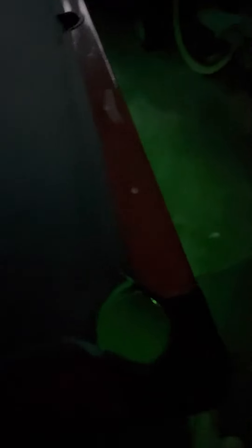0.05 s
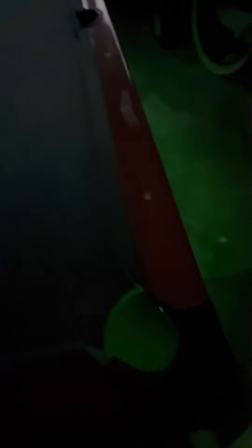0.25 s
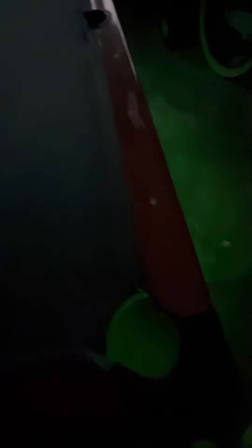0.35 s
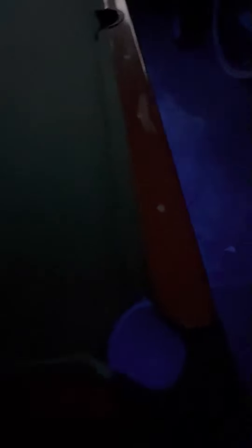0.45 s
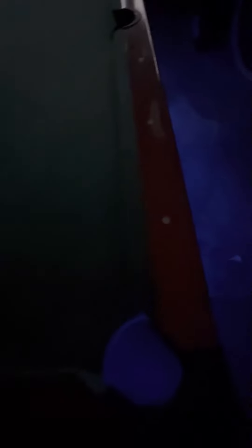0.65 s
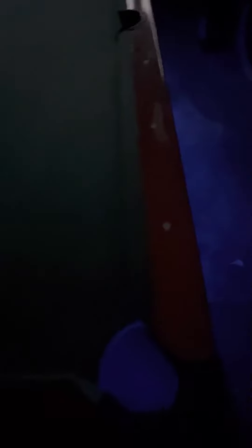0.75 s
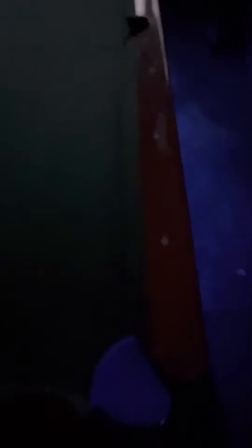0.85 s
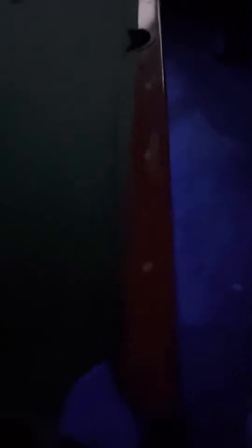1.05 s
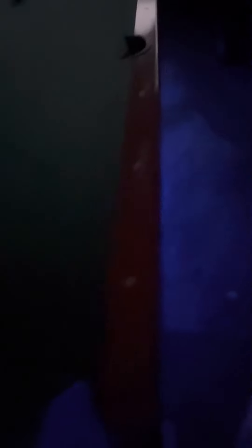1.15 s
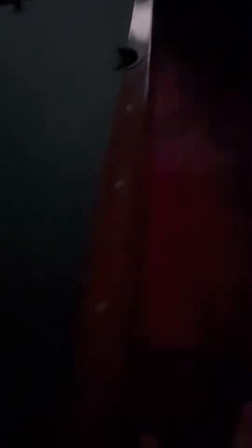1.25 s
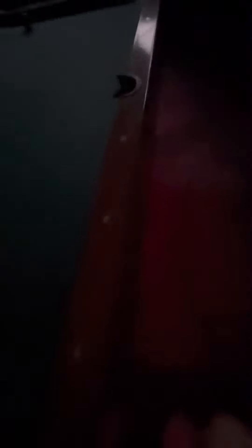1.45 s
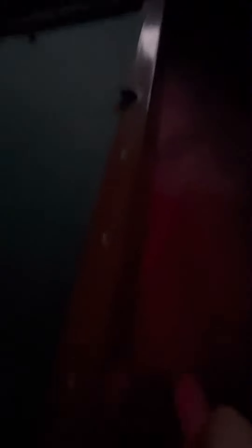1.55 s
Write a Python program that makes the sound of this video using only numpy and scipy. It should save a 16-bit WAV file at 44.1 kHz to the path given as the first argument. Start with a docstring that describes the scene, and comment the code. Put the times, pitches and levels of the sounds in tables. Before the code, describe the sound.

A ball rolls briefly on a wooden pool table and ends in a hard double knock. Weaker clacks and knocks follow with short rumbles, then a thin distant click. Heard close by in a quiet room with faint ventilation.

```python
"""Knocks on a wooden pool table in a quiet room. Something rolls with a low rumble and ends in a hard
double knock; weaker knocks and clacks follow, then a thin click further off. Each blow crosses the wood
as a bending wave, high notes first, leaves faint low tones lingering and dies away in the room.
Ventilation noise and mains hum go on underneath."""
import sys
import numpy as np
from scipy import signal
from scipy.fft import rfft, irfft
from scipy.io import wavfile

SR = 44100
rng = np.random.default_rng(int(sys.argv[2]) if len(sys.argv) > 2 else 0)


def wrap_up_sound(samples):
    """Save the sound to the file named by the first command line argument, as 16-bit audio."""
    columns = np.atleast_2d(samples).T
    # keep every value between -1 and 1, then stretch to whole-number steps
    tamed = np.clip(columns, -1, 1)
    steps = np.round(tamed * 32767).astype(np.int16)
    wavfile.write(sys.argv[1], SR, steps)


N = 70560
T = np.arange(N) / SR
SIZE = 2 * N  # extra space for the echoes
HZ = np.maximum(np.arange(N + 1) * SR / SIZE, 1)  # the frequencies of every spectrum
FADE_60_DB = np.log(1000)  # a "fade time" is the time a sound takes to drop by 60 dB

# light, hard hits: (time [s], pitch ratio, tone 1 [dB], tone 2 [dB], tone 3 [dB], thump [dB])
CLACK_HITS = [(0.5930, 0.95, 11.5, 20, 7, 17.9), (0.839, 0.947, -13, 2, 1.5, 4),
              (1.0093, 0.896, 5.5, -1, 5, 13.2), (1.1290, 0.91, -4.5, -7, -5, 5.3)]


def from_db(db):
    """Turns decibels into a factor to multiply by."""
    return 10 ** (np.asarray(db) / 20)


def at_hz(points, hz=HZ):
    """Reads between the rows of a (frequency, value) table, with octaves evenly spaced."""
    freqs, values = np.transpose(points)
    return np.interp(np.log(hz), np.log(freqs), values)


def delay(s):
    """Spectrum of a click at s seconds; multiplying by it delays a sound."""
    return np.exp(-2j * np.pi * HZ * s)


def diffuse():
    """Spectrum of white noise from all around: alike in both ears in the bass, wide in the treble."""
    # stereo width: (frequency [Hz], side minus mid [dB])
    widths = [(60, -17.5), (200, -25), (370, -14.5), (670, -4.5), (1200, -3), (2300, -3), (4000, 3),
              (7500, 2.5), (13000, -5.5)]
    mid, side = rfft(rng.standard_normal((2, SIZE)))
    width = from_db(at_hz(widths))
    return (mid + side * width * [[1], [-1]]) / np.sqrt(1 + width ** 2)


def noise(colour):
    """Stereo noise with the given tone colour, scaled to an average (rms) size of 1."""
    shaped = irfft(diffuse() * from_db(at_hz(colour)))[:, :N]
    return shaped / shaped.std()


def background():
    """Ventilation noise, mains hum and a faint fan tone."""
    # tone colour of the ventilation: (frequency [Hz], relative level [dB])
    air_colour = [(25, -40), (72, -12.5), (130, -6.5), (264, -11), (335, -7.5), (600, -9.5), (790, -7),
                  (900, -7), (1250, -17.5), (2900, -23.5), (4600, -26), (6300, -34.5), (9000, -38.5),
                  (13000, -41.5)]
    # mains hum and fan tone: (frequency [Hz], level [dB])
    tones = [(59.7, -55.5), (797, -61.5)]
    air = from_db(-50) * noise(air_colour)
    hum = sum(from_db(db) * np.sqrt(2) * np.sin(2 * np.pi * (hz * T + rng.random())) for hz, db in tones)
    return air + hum


def rolling():
    """Rolling rumbles: a long run that starts with a scuff, then short ones after the weaker blows."""
    # runs of rolling: (start [s], start of fade [s], level [dB])
    runs = [(0.029, 0.328, -33), (0.602, 0.655, -40.5), (0.795, 0.856, -37.5), (1.012, 1.052, -44.5)]
    # tone colour of the rumble: (frequency [Hz], relative level [dB])
    rumble_colour = [(30, -19), (60, -2.5), (120, 6), (220, 2), (360, -4), (600, -14.5), (1000, -23),
                     (2500, -30.5), (4000, -37), (7000, -80), (13000, -45)]
    # tone colour of the scuff: (frequency [Hz], relative level [dB])
    scuff_colour = [(300, -13.5), (850, 5.5), (1500, 0), (2600, -10), (4500, -24), (9000, -66)]
    rise_s, decay_s = 0.0025, 0.059
    scuff_at_s, scuff_decay_s, scuff_db = 0.044, 0.017, -38.5
    level = 0
    for start, end, db in runs:
        rise = np.clip((T - start) / rise_s, 0, 1)
        fade = np.exp(-np.maximum(T - end, 0) / decay_s)
        level = level + from_db(db) * rise * fade
    scuff = from_db(scuff_db) * (T > scuff_at_s) * np.exp(-np.abs(T - scuff_at_s) / scuff_decay_s)
    return level * noise(rumble_colour) + scuff * noise(scuff_colour)


def thumps():
    """Spectrum of low pushes on the table: bumps while rolling, and one just after each clack."""
    # bumps while rolling: (time [s], strength [dB])
    bumps = [(0.031, 10.5), (0.043, 11), (0.058, 11), (0.094, 8.5), (0.15, 11.5), (0.191, 7), (0.812, 10.5)]
    # tone colour of a thump: (frequency [Hz], gain [dB])
    colour = [(30, -51), (60, -9.5), (110, -8.5), (220, -2.5), (330, 2), (500, -15), (1000, -26),
              (3000, -50.5), (12000, -68)]
    lag_s = 0.00595
    after_clacks = [(s + lag_s, db) for s, *_, db in CLACK_HITS]
    return sum(from_db(db + at_hz(colour)) * delay(s) for s, db in [*bumps, *after_clacks])


def knocks():
    """Spectrum of heavy blows on the wood; a softer contact loses the treble."""
    # blows: (time [s], strength [dB], treble cut-off [Hz], fall above it [dB per octave])
    blows = [(0.215, 9.5, 1090, 9), (0.2227, 32.5, 1570, 15.5), (0.2363, 32, 910, 11.5),
             (0.7947, 22.5, 674, 15.5)]
    # tone colour of a knock: (frequency [Hz], gain [dB])
    colour = [(50, -41), (100, -38), (215, -8.5), (290, 2.5), (380, 1.5), (500, -2.5), (760, 0),
              (1050, -12.5), (1450, -8), (2000, -18), (2700, -9), (4200, -18), (6100, -33), (8500, -28),
              (13000, -23)]
    contacts = 0
    for s, db, cutoff_hz, fall in blows:
        octaves_above = np.log2(1 + (HZ / cutoff_hz) ** 4) / 4
        contacts = contacts + from_db(db - fall * octaves_above) * delay(s)
    return from_db(at_hz(colour)) * contacts


def ticks():
    """Tiny bright bursts of noise: spectra of the direct sound and of what is sent to the room."""
    # sharp ticks: (time [s], strength [dB], centre [Hz], gain into the room [dB])
    events = [(0.2238, -36.5, 7900, 9), (0.2251, 0.5, 2800, -1.5), (0.2393, -3.5, 2780, 2.5),
              (0.5945, -28.5, 13000, 7), (0.801, -26.5, 3600, 3), (1.0110, -29, 12800, -7),
              (1.124, -22, 4800, 4), (1.3290, -16, 7800, 3.5), (1.333, -10, 4230, -1.5)]
    decay_s, sharpness = 0.00083, 1.3
    direct, send = 0, 0
    for s, db, hz, send_db in events:
        burst = rng.standard_normal(N) * np.exp(-T / decay_s)
        burst /= np.linalg.norm(burst)
        ratio = HZ / hz
        band = ratio / sharpness / (1 + 1j * ratio / sharpness - ratio ** 2)  # keeps sound near hz
        tick = rfft(burst, SIZE) * band ** 2 * from_db(db) * delay(s)
        direct = direct + tick
        send = send + tick * from_db(send_db)
    return direct, send


def clacks():
    """Hard hits ring three short tones: spectra of the direct sound and of what is sent to echo."""
    # tones of a clack: (base pitch [Hz], base fade time [s], gain into the echoes [dB])
    tones = [(763, 0.0064, 2.5), (1570, 0.0086, -9), (2480, 0.0044, -5)]
    cutoff_hz = 2940
    direct, send = 0, 0
    for s, pitch, *strengths, _ in CLACK_HITS:
        freq = HZ / pitch  # shifts the tones and the cut-off together
        contact = delay(s) / np.sqrt(1 + (freq / cutoff_hz) ** 18)
        for db, (hz, fade_s, send_db) in zip(strengths, tones):
            sharpness = np.pi * hz * fade_s / FADE_60_DB
            tone = from_db(db) * contact / (1 + 1j * sharpness * (freq / hz - hz / freq))
            direct = direct + tone
            send = send + tone * from_db(send_db)
    return np.array([direct, send]) * bending(travel_at_1khz_s=0.001954)


def bending(travel_at_1khz_s):
    """High notes travel faster through bending wood, so a click becomes a falling chirp."""
    slowest_hz, fastest_hz = 147, 2810
    slowness = np.sqrt(1000 / np.clip(HZ, slowest_hz, fastest_hz))
    lag_s = travel_at_1khz_s * (slowness - np.sqrt(1000 / fastest_hz))
    return np.exp(-2j * np.pi * np.cumsum(lag_s) * SR / SIZE)


def lingering_tones():
    """Faint low ringing tones that linger after each knock, clack and thump."""
    # ringing tones: (pitch [Hz], strength [dB], fade time [s])
    tones = [(119.7, -65.5, 0.81), (150.9, -55, 0.36), (223, -57, 0.23), (294, -78.5, 0.2),
             (367, -57, 0.36), (456.6, -53, 0.22), (528, -61, 0.4), (596, -65.5, 0.73), (684, -63, .6),
             (780, -79, 0.36), (803, -60, 0.36), (876, -58, 0.43), (1192, -54.5, .45), (1183, -59, 0.56)]
    ring = sum(from_db(db - 60 * T / fade_s) * np.sin(2 * np.pi * hz * T) for hz, db, fade_s in tones)
    return rfft(ring, SIZE)


def ears():
    """Above the bass, direct sound reaches the left ear first; the louder side depends on pitch."""
    # balance between the ears: (frequency [Hz], left minus right [dB])
    balance = [(300, 1), (670, 0), (1200, 7), (2200, -4), (4000, -9.5), (8000, 4)]
    left_lead_s, wide_above_hz = 0.00018, 890
    lead_s = left_lead_s / (1 + (wide_above_hz / HZ) ** 2)
    half = np.array([[.5], [-.5]])
    return from_db(half * at_hz(balance)) * delay(-half * lead_s)


def scatter():
    """Dense, short echoes inside the table's frame roughen the start of each blow."""
    # tone colour of these echoes: (frequency [Hz], gain [dB])
    colour = [(200, 4.5), (700, -2.5), (1500, 0), (3000, 7.5), (8000, 17.5)]
    gain_db, fade_s = -4, 0.03
    rate = FADE_60_DB / fade_s
    burst = irfft(diffuse())[:, :N] * np.sqrt(2 * rate / SR) * np.exp(-rate * T)
    return rfft(burst, SIZE) * from_db(gain_db + at_hz(colour))


def room():
    """The room answers with quick early echoes and a longer tail; each octave has its own tail."""
    # early echoes: (frequency [Hz], gain [dB])
    early_gains = [(100, -12), (350, -13), (900, -10.5), (2500, -6), (6000, 0)]
    # length of the tail: (frequency [Hz], fade time [s])
    tail_fades = [(100, 0.64), (350, 0.68), (1000, 0.83), (2800, 0.65), (6000, 1), (13000, 0.12)]
    # tone colour of the room: (frequency [Hz], gain [dB])
    colour = [(60, 4), (110, 7.5), (220, 5.5), (400, 4.5), (700, 0), (1100, 5.5), (1600, -0.5), (2100, 4),
              (2700, 4), (3400, 6), (5000, 5), (12000, -2.5)]
    early_fade_s, tail_db, build_s = 0.28, -6, 0.0063
    white, echoes = diffuse(), 0
    centres = np.geomspace(60, 15360, 9)
    for hz in centres:
        octave = np.interp(np.log(HZ), np.log(centres), centres == hz)
        band = irfft(white * octave)[:, :N]
        for db, fade_s in ((at_hz(early_gains, hz), early_fade_s), (tail_db, at_hz(tail_fades, hz))):
            rate = FADE_60_DB / fade_s
            echoes = echoes + band * from_db(db) * np.sqrt(rate / SR) * np.exp(-rate * T)
    build_up = 1 - np.exp(-(T / build_s) ** 2)
    return rfft(echoes * build_up, SIZE) * from_db(at_hz(colour))


def scene():
    """Blows and ticks, direct and echoed, over the rumble and the background."""
    # multiplying spectra passes a sound through the wood or the room
    heavy = (knocks() + thumps()) * bending(travel_at_1khz_s=0.004285)
    clack, clack_send = clacks()
    tick, tick_send = ticks()
    direct = ((heavy + clack) * (1 + lingering_tones()) + tick) * ears()
    frame_echoes = (heavy + clack_send) * scatter()
    room_echoes = (heavy + clack_send + tick_send) * room()
    return irfft(direct + frame_echoes + room_echoes)[:, :N] + rolling() + background()


def record(dry):
    """Rounds off the loudest peaks and cuts the highest treble."""
    ceiling, cutoff_hz = 0.95, 14800
    rounded = dry / (1 + (dry / ceiling) ** 8) ** (1 / 8)
    low_pass = signal.cheby2(12, 60, cutoff_hz, fs=SR, output="sos")
    return signal.sosfilt(low_pass, rounded)


dry = scene()
out = record(dry)
wrap_up_sound(out)
```